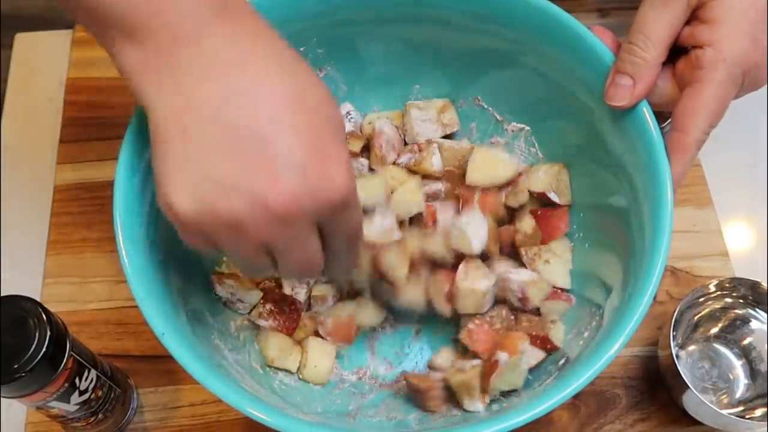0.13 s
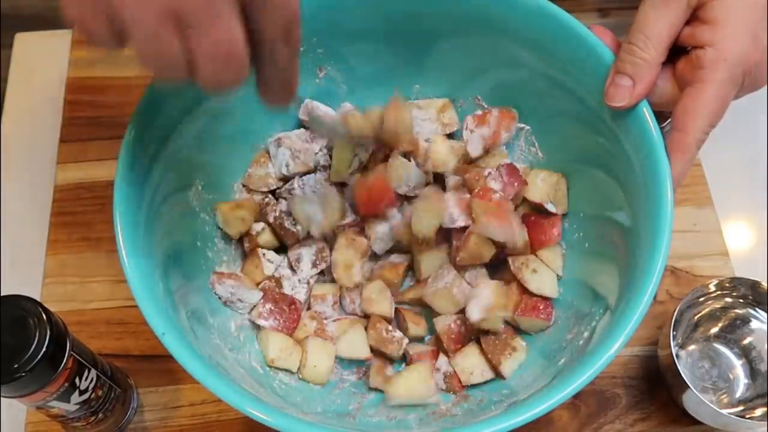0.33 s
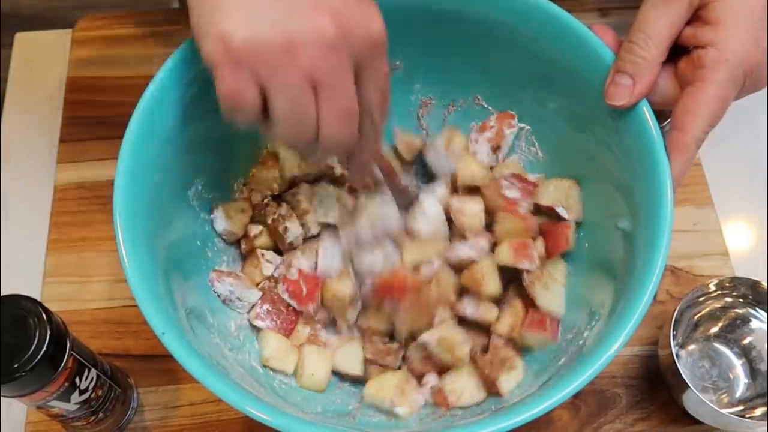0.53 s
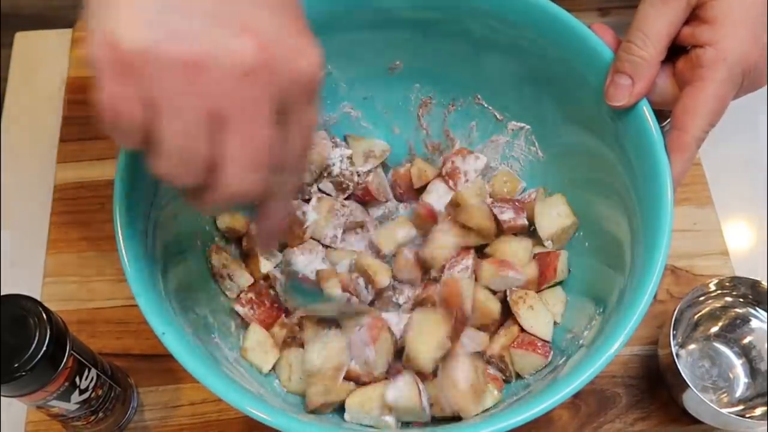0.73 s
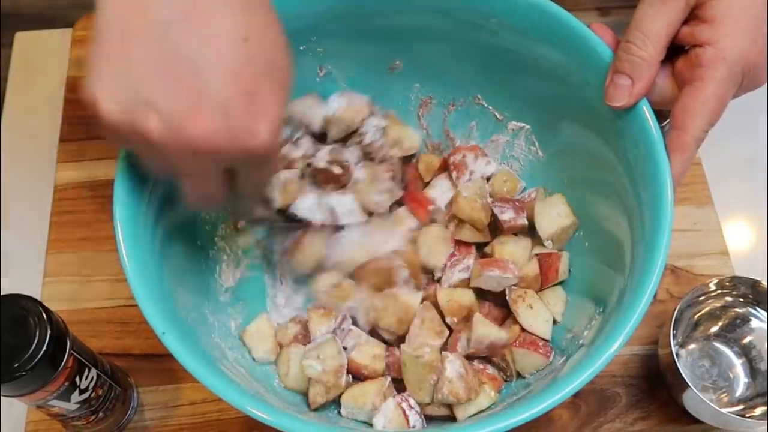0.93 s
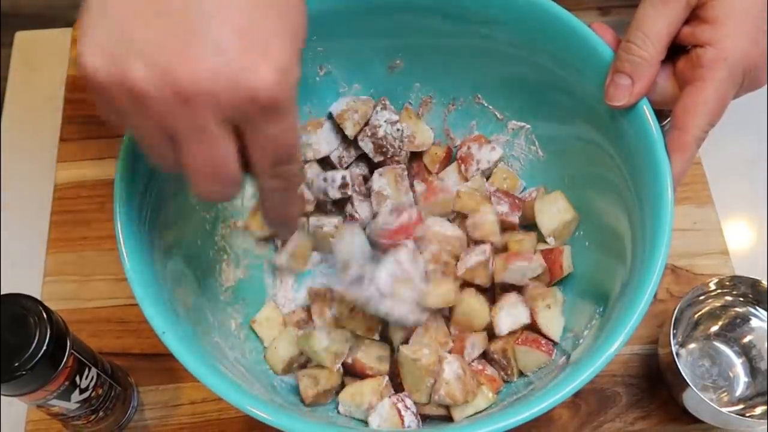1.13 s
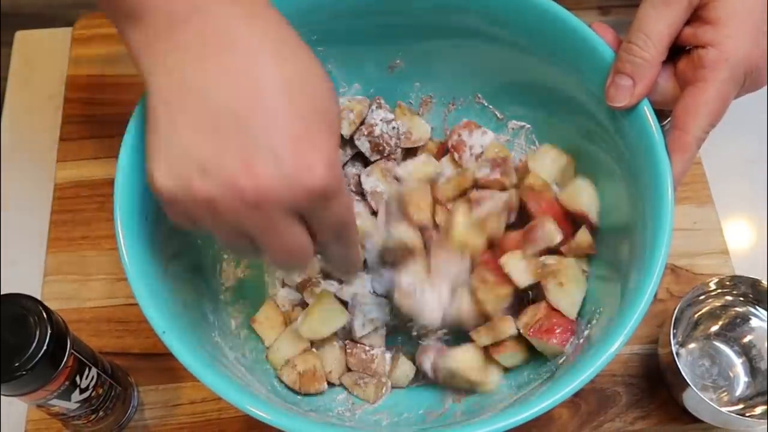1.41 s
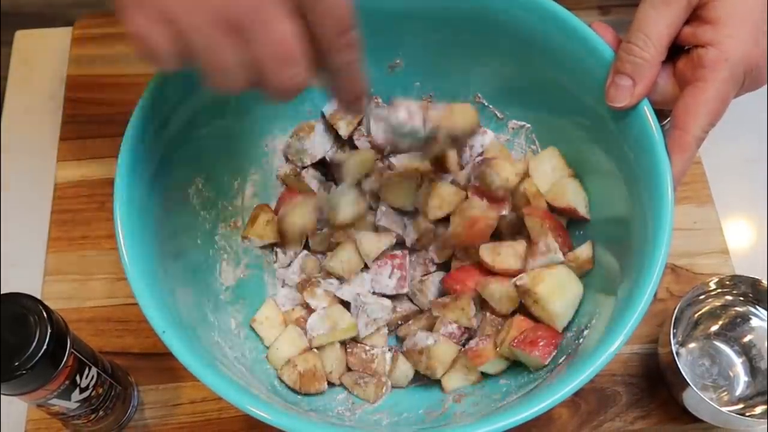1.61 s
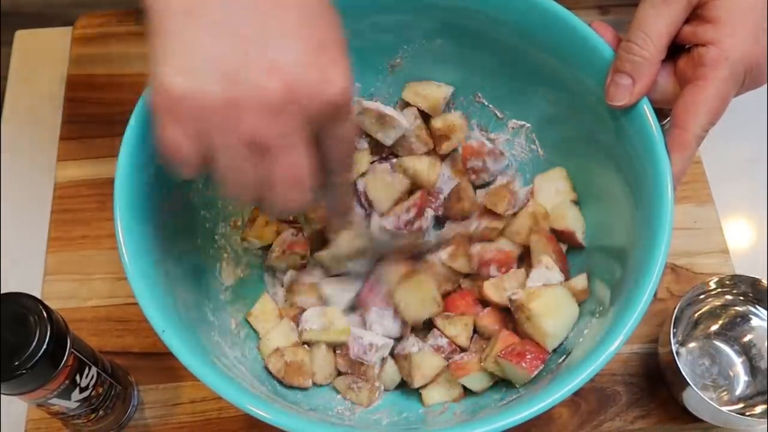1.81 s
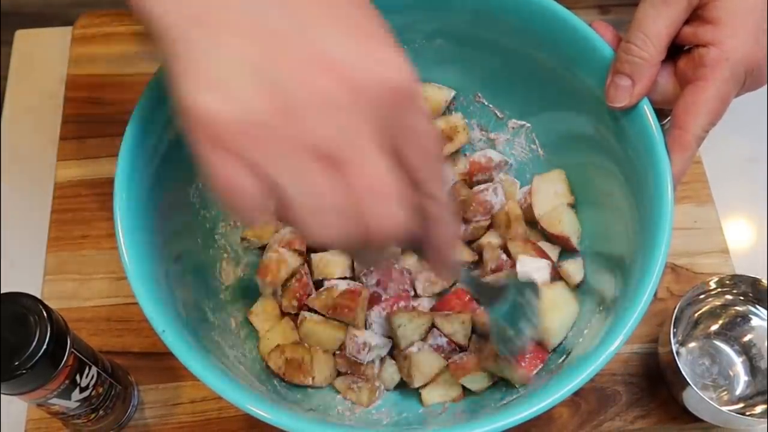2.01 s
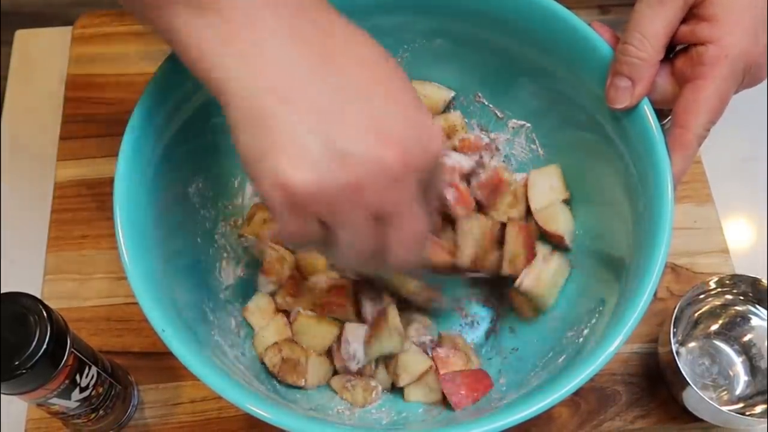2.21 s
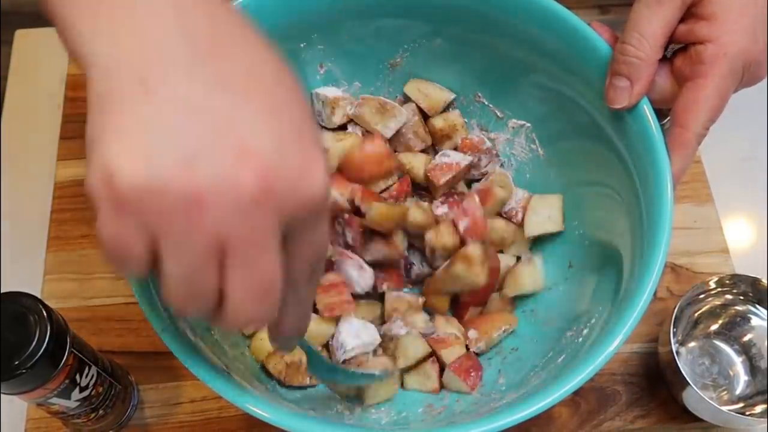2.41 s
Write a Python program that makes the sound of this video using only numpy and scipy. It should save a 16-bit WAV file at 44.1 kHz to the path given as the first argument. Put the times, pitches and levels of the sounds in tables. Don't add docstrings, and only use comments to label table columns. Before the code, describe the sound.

A metal spoon stirs chopped fruit in a plastic bowl, knocking sharply and scraping in a kitchen

```python
import sys
import numpy as np
from scipy import signal
from scipy.fft import rfft, irfft
from scipy.io import wavfile
from scipy.ndimage import uniform_filter1d

SR = 44100
rng = np.random.default_rng(int(sys.argv[2]) if len(sys.argv) > 2 else 0)


def gain_from_db(level_db):
    decades = np.asarray(level_db, float) / 20
    return 10 ** decades


def store_wav(level_fs):
    pcm = np.round(np.clip(np.atleast_2d(level_fs), -1, 1) * 32767)
    wavfile.write(sys.argv[1], SR, pcm.T.astype(np.int16))


N = 112454

# (frequency [Hz], level [dB per Hz])
KITCHEN_SPECTRUM = [(12, -54), (20, 1.5), (513, 5), (1260, -3.5), (2750, -18), (4060, -9.5), (9400, -33),
                    (12800, -36.5), (16000, -61.5)]
# (frequency [Hz], width [Hz], time to fade by 60 dB [s], level [dB])
ROOM_TAIL = [(241.6, 110, 0.92, -19), (510, 300, 0.3, -12), (1050, 840, 0.36, -15.5), (1500, 1000, .4, -24),
             (2470, 700, 0.54, -22), (3150, 2000, 0.1, -27.5), (4630, 3000, 0.46, -24.5),
             (8100, 5000, 0.11, -39.5)]
# (delay [s], level [dB])
ECHOES = [(.0165, -25), (.026, -30), (.04, -34)]
# (start [s], length [s], level [dB], hiss [dB], bowl rumble [dB])
STROKES = [(-.02, 0.14, -50, -32, -9), (0.119, 0.09, -42.5, -28, -24), (0.57, 0.24, -51.5, -30.5, -9.5),
           (0.891, 0.25, -52.5, -26.5, -9.5), (1.391, 0.21, -50.5, -27, -9),
           (1.689, 0.088, -65.5, -27, 11.5), (1.813, 0.15, -48.5, -28.5, -1.5), (2.023, 0.15, -68, -26, 13),
           (2.161, 0.068, -49.5, -18, -3.5), (2.229, 0.1, -43, -46.5, -12), (2.345, 0.29, -49, -30, -12)]
# (frequency [Hz], level [dB per Hz])
SCRAPE_SPECTRUM = [(88, -58.5), (150, -11.5), (545, -2.5), (675, -25.5), (1530, -12.5), (3100, -8),
                   (9440, -42), (13200, -60), (16000, -44.5)]
# (time [s], peak [dB], pitch [Hz], grit [dB])
TICKS = [(.128, -25, 3327, -1.5), (0.5502, -27.5, 900, -8), (0.552, -28.5, 3700, -2),
         (.869, -41, 2860, -3.5), (1.315, -38.5, 2320, -9.5), (1.332, -41.5, 3140, -1),
         (1.488, -37, 2990, -1.5), (1.5049, -34.5, 3400, 5), (1.601, -41, 3110, -2),
         (1.726, -43.5, 2220, 2), (1.762, -39, 2560, -11), (1.837, -41, 2500, 3), (1.916, -39.5, 2800, 0.5),
         (1.933, -41.5, 3050, 4), (2.067, -36, 1655, -12), (2.178, -29, 1050, -11),
         (2.2271, -14, 2740, -16), (2.229, -17.5, 4200, -9), (1.821, -49.5, 2500, -3),
         (1.852, -48, 3050, -6), (1.885, -51, 2946, -6), (1.985, -44, 3270, -1), (2.034, -42.5, 2600, -9),
         (2.468, -40.5, 2650, -1.5), (2.507, -53.5, 2600, -4)]
# (time [s], peak [dB], pitch [Hz])
THUDS = [(0.053, -24.5, 577), (0.127, -41, 543), (0.257, -23, 1110), (0.404, -23, 790), (0.421, -33, 611),
         (0.499, -47, 511), (0.815, -64.5, 397), (0.858, -16, 770), (1.006, -32.5, 510),
         (1.082, -24.5, 826), (1.112, -34, 510), (1.302, -30.5, 606), (1.312, -28, 788), (1.376, -34, 552),
         (1.505, -30.5, 932), (1.724, -30.5, 517), (1.741, -39.5, 500), (1.762, -37.5, 423),
         (1.834, -28.5, 510), (1.849, -43, 384), (1.916, -26, 593), (1.932, -27, 530), (1.967, -32, 810),
         (2.04, -42, 750), (2.173, -33.5, 568), (2.349, -29, 470), (2.464, -26.5, 554), (2.489, -29.5, 574)]
# (time [s], peak [dB], contact [ms], clatter [dB], crack [dB])
KNOCKS = [
    (0.2115, 11, 0.85, -10, -31),
    (0.571, -2, 1.41, -8, -36),
    (1.0547, 4, 0.43, -10.5, -34.5),
    (2.2104, -1, 2.1, -17, -27),
    (2.2911, 2, 1.02, -18.5, -50),
]
WASH_DB = [-5.5, -1, 0, 1, -7]
# (frequency [Hz], level [dB], time to fade by 60 dB [s])
WALL_MODES = [(526, -19.5, 0.056), (883, -21.5, 0.053), (1110, -20.5, 0.024), (1328, -9.5, 0.031),
              (1600, -19, .03), (1938, -19, .02), (2530, -15.5, 0.045), (2650, -18, .04), (2809, -4.5, .04),
              (3299, -2, 0.09), (3703, -10.5, 0.09), (4430, -16.5, .02), (5644, -28, .02), (7390, -24, .02)]
BASE_MODES = [(490, 5, 0.022), (750, -17, 0.0072), (1004, 5.5, 0.019), (1424, -4.5, 0.01), (2370, -7, 0.04),
              (2748, -2, 0.012), (3050, 1.5, 0.0234), (3675, 4.5, 0.03), (3990, 1.5, .03),
              (4350, 4.5, 0.024)]
SLOPE_MODES = [(267, -18.5, 0.033), (444, -14.5, 0.025), (1040, -5.5, 0.011), (1810, -5, 0.03),
               (2340, -5.5, .02), (2584, -0.5, 0.038), (2876, -7, .03), (3300, -5, .03),
               (3600, -5.5, 0.094), (4200, -3.5, 0.031), (5200, -14.5, 0.015), (6370, -17.5, .008),
               (7150, -16.5, 0.0094), (8340, -19, .006)]
LIP_MODES = [(407, -14.5, 0.058), (1040, -9.5, 0.099), (1700, -15.5, 0.086), (2650, -8, 0.21),
             (2886, -4, 0.082), (3592, -5, 0.1), (3945, -5.5, 0.16), (4320, -22, .05), (4510, -8, 0.06),
             (5370, -6.5, 0.04), (5930, -12, 0.03), (6815, -10.5, 0.032), (7480, -14, .02)]
BELLY_MODES = [(290, -17, 0.035), (517, 0.5, 0.022), (840, -16, 0.024), (1004, -10.5, 0.051),
               (1360, -4.5, 0.033), (1800, -14.5, 0.078), (2554, 1.5, 0.15), (2990, -4.5, 0.064),
               (3480, -8.5, 0.062), (3630, -16, 0.06), (4060, -12, 0.14), (4500, -32, .04),
               (4870, -38, .03)]


def unit(x):
    return x / np.sqrt(np.mean(x ** 2))


def band(x, hz, width):
    return signal.lfilter(*signal.iirpeak(min(hz, .45 * SR), hz / width, fs=SR), x)


def butter(x, order, hz, kind="low"):
    return signal.lfilter(*signal.butter(order, hz, kind, fs=SR), x)


def colour(x, spectrum):
    f = np.fft.rfftfreq(2048, 1 / SR)
    hz, db = np.array(spectrum).T
    log_gain = np.interp(np.log(f + 1), np.log(hz), db) * np.log(10) / 20
    cepstrum = irfft(log_gain)
    cepstrum[1:1024] *= 2
    cepstrum[1025:] = 0
    return signal.fftconvolve(x, irfft(np.exp(rfft(cepstrum))))[:len(x)]


def add(out, start, x):
    i = int(start * SR)
    out[i:i + len(x)] += x[:N - i]


def walk(rate):
    hold = int(SR / rate)
    steps = np.repeat(rng.standard_normal(N // 50), hold)[:N]
    return unit(uniform_filter1d(steps, hold))


def clicks(rate, spread_db):
    chance = rng.random(N)
    strength = np.minimum(rng.exponential(size=N), 3.5)
    sign = np.where(chance < rate / SR / 2, 1, -1)
    return (chance < rate / SR) * sign * gain_from_db(spread_db * strength)


def kitchen():
    noise_db, hum_db, hum_hz = -57.5, -69, 120
    mid, side = (unit(colour(rng.standard_normal(N), KITCHEN_SPECTRUM)) * gain_from_db(noise_db + 1.2 * walk(5.75))
                 for _ in range(2))
    hum = gain_from_db(hum_db + 2.2 * walk(14)) * np.sin(2 * np.pi * hum_hz * np.arange(N) / SR)
    return mid + hum, gain_from_db(-11) * side


def room(x):
    rise_s, smear_ms = 0.0018, 0.73
    t = np.arange(SR) / SR
    noise = rng.standard_normal(SR)
    response = np.zeros(SR)
    for hz, width, t60, db in ROOM_TAIL:
        tail = unit(band(band(noise, hz, width), hz, width))
        response += gain_from_db(db - 60 * t / t60) * tail * np.sqrt(hz / SR / 100)
    response *= 1 - np.exp(-(t / rise_s) ** 2)
    for delay, db in ECHOES:
        smear = band(rng.standard_normal(300), 1700, 5900) * np.exp(-t[:300] * 1000 / smear_ms)
        add(response, delay, gain_from_db(db) * smear / np.sqrt(np.sum(smear ** 2)))
    return signal.fftconvolve(x, response)[:N]


def scrape():
    rise_s, fall_s = .012, 0.053
    rub_db, rub_flicker_db, tumble_db = -1, 3.0, -8
    tumble_hz, rumble_hz, hiss_hz = 444, 130, 11600
    t = np.arange(N) / SR
    effort, hiss_level, rumble_level = np.zeros((3, N))
    for start, length, db, hiss_db, rumble_db in STROKES:
        fade = np.exp(-np.maximum(t - start - length, 0) / fall_s)
        stroke = gain_from_db(db) * np.clip((t - start) / rise_s, 0, 1) * fade
        effort += stroke
        hiss_level += stroke * gain_from_db(hiss_db)
        rumble_level += stroke * gain_from_db(rumble_db)
    rub = gain_from_db(rub_db + rub_flicker_db * walk(25)) * rng.standard_normal(N)
    grit = unit(clicks(1500, 3)) + rub
    tumble = unit(band(band(clicks(250, 3.1), tumble_hz, 410), tumble_hz, 570))
    rumble = unit(band(band(clicks(150, 4.4), rumble_hz, 140), rumble_hz, 200))
    hiss = unit(band(band(grit, hiss_hz, 5000), hiss_hz, 6000))
    edge = unit(colour(grit, SCRAPE_SPECTRUM))
    return effort * (edge + gain_from_db(tumble_db) * tumble) + rumble_level * rumble + hiss_level * hiss


def skid():
    start_s, level_db, rise_s, fade_s, hz = 2.2115, -27, 0.00041, 0.029, 4420
    t = np.maximum(np.arange(N) / SR - start_s, 0)
    grit = unit(clicks(3000, 0.83)) + rng.standard_normal(N)
    grit = unit(band(band(band(grit, hz, 4300), hz, 4400), 4100, 8900))
    return gain_from_db(level_db + 2.8 * walk(60)) * grit * (1 - np.exp(-t / rise_s)) * np.exp(-t / fade_s)


def ticks():
    t60_s, rise_ms, top_hz = 0.017, 1, 5200
    out, t = np.zeros(N), np.arange(1000) / SR
    for start, db, hz, grit_db in TICKS:
        grit = unit(butter(band(rng.standard_normal(len(t)), 1900, 4500), 3, top_hz))
        tick = np.sin(2 * np.pi * hz * t) + gain_from_db(grit_db) * grit
        rise = 1 - np.exp(-(t * 1000 / rise_ms) ** 2)
        add(out, start, gain_from_db(db - 60 * t / t60_s) * rise * tick)
    return out


def thuds():
    rise_cycles, fall_cycles = 0.31, 0.94
    out, t = np.zeros(N), np.arange(1500) / SR
    for start, db, hz in THUDS:
        cycles = t * hz
        rise = 1 - np.exp(-(cycles / rise_cycles) ** 2)
        thud = np.sin(2 * np.pi * cycles) * rise * np.exp(-cycles / fall_cycles)
        add(out, start + 0.001873, -gain_from_db(db) * thud / np.abs(thud).max())
    return out


def knocks():
    damped_ms, clatter_ms, crack_ms = 6, 2.5, 2.3
    clatter_hz, crack_hz, bowl_low_hz, body_top_hz = 2800, 9200, 220, 2000
    wall_ring_db, wall_wash_db = -9, 9
    near, to_walls = np.zeros((2, N))
    t = np.arange(3000) / SR
    ms = t * 1000
    spots = (WALL_MODES, BASE_MODES, SLOPE_MODES, LIP_MODES, BELLY_MODES)
    for (start, db, contact_ms, clatter_db, crack_db), wash_db, modes in zip(KNOCKS, WASH_DB, spots):
        ring = np.zeros(len(t))
        for k, (hz, mode_db, t60) in enumerate(modes):
            ring += (-1) ** k * gain_from_db(mode_db - 60 * t / t60) * np.sin(2 * np.pi * hz * t)
        ring = ring / np.abs(ring).max() * np.exp(-(ms / damped_ms) ** 2)
        clatter = unit(band(rng.standard_normal(len(t)), clatter_hz, 3500))
        clatter = butter(clatter, 4, 4500) * np.exp(-ms / clatter_ms)
        crack = unit(band(band(rng.standard_normal(len(t)), crack_hz, 4400), crack_hz, 4900))
        crack *= np.exp(-ms / crack_ms)
        push = gain_from_db(db) * (1 - np.exp(-(ms / contact_ms) ** 2))
        hit = push * (ring + gain_from_db(clatter_db) * clatter + gain_from_db(crack_db) * crack)
        hit = butter(hit, 2, bowl_low_hz, "high")
        body = signal.filtfilt(*signal.butter(2, body_top_hz, fs=SR), hit)
        wash = unit(butter(t == 0, 3, [2300, 4700], "band")) / np.sqrt(len(t))
        add(near, start, hit)
        dull_hit = body + gain_from_db(wall_ring_db) * (hit - body)
        add(to_walls, start, dull_hit + gain_from_db(db + wall_wash_db + wash_db) * wash)
    return near, to_walls


def scene():
    side_db, side_hz, side_ms, side_low_hz = -3.5, 4940, 1.9, 3400
    knock_side_db, room_wide = -8, 0.18
    hum, hum_side = kitchen()
    small = scrape() + skid() + ticks() + thuds()
    direct, to_walls = knocks()
    ports = rng.standard_normal(300) * np.exp(-np.arange(300) / SR * 1000 / side_ms)
    ports /= np.sqrt(np.sum(ports ** 2))
    apart = np.convolve(gain_from_db(knock_side_db) * direct + small, ports)[:N]
    apart = butter(band(apart, side_hz, 2500), 4, side_low_hz, "high")
    room_side = room_wide * band(room(to_walls + small), 4500, 6000)
    side = gain_from_db(side_db) * apart + room_side + hum_side
    mid = direct + small + room(to_walls + small) + hum
    return np.array([mid + side, mid - side])


def roll_off(x):
    return signal.sosfilt(signal.butter(12, 16250, fs=SR, output="sos"), x)


def record(dry):
    clip_level, top_hz = .98, 16100
    clipped = np.clip(dry, -clip_level, clip_level)
    mix = signal.sosfilt(signal.ellip(8, .2, 60, top_hz, fs=SR, output="sos"), clipped)
    return roll_off(mix)


dry = scene()
out = record(dry)
store_wav(out)
```